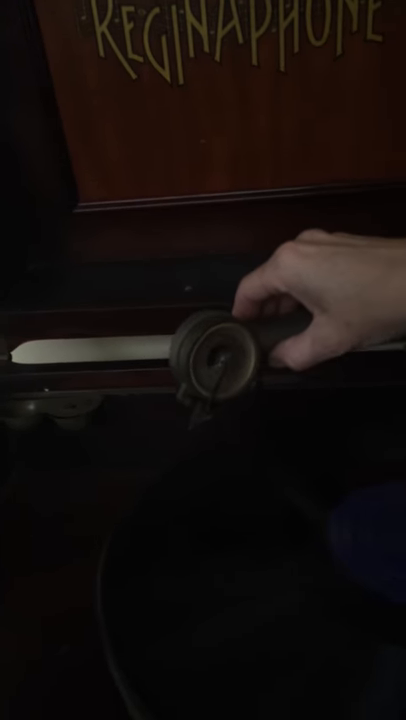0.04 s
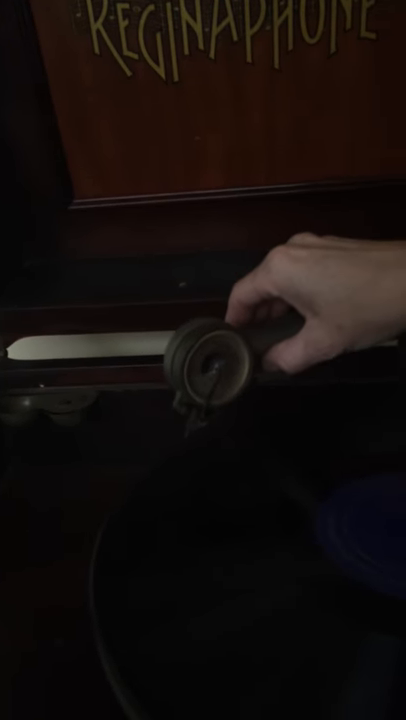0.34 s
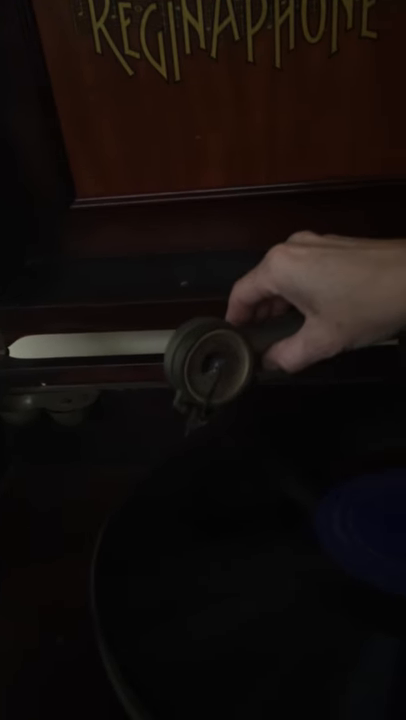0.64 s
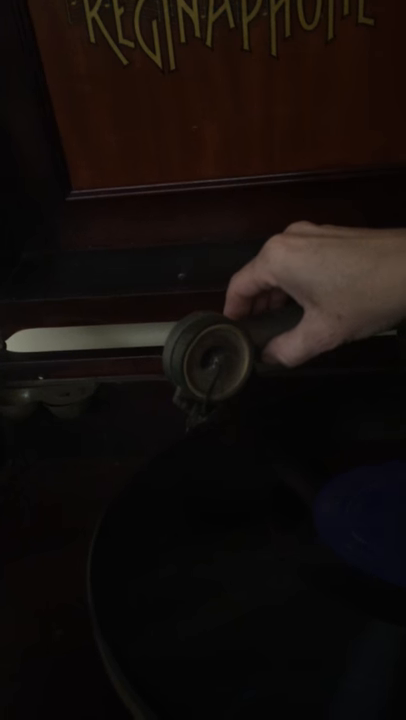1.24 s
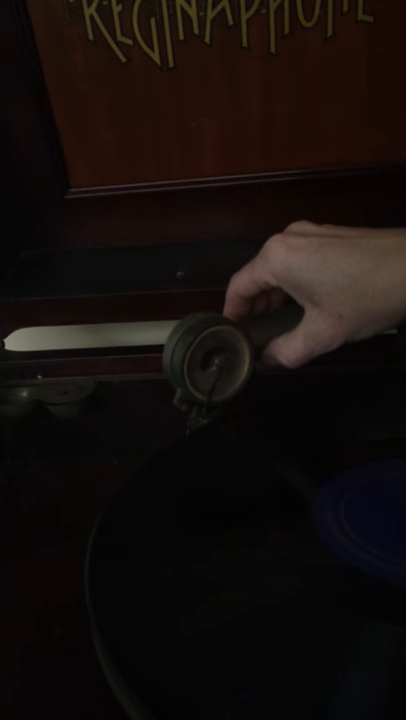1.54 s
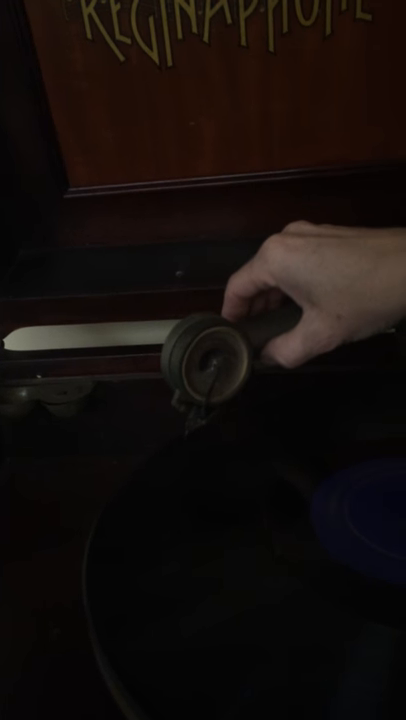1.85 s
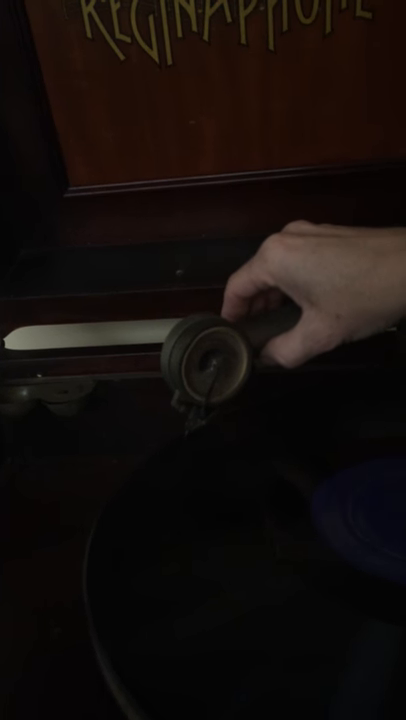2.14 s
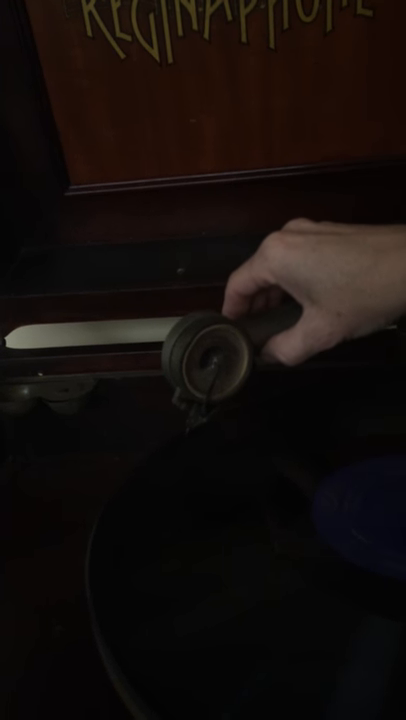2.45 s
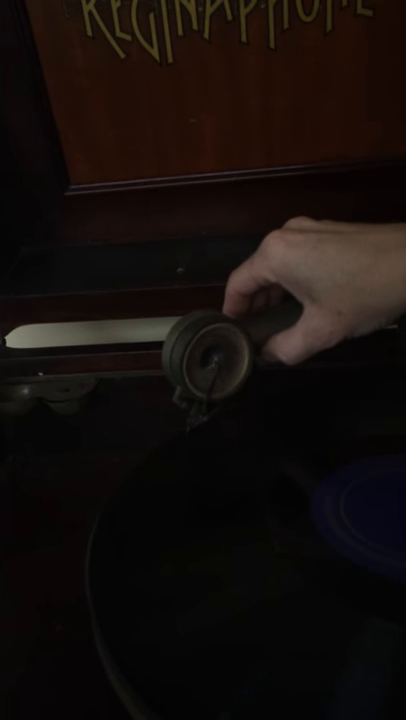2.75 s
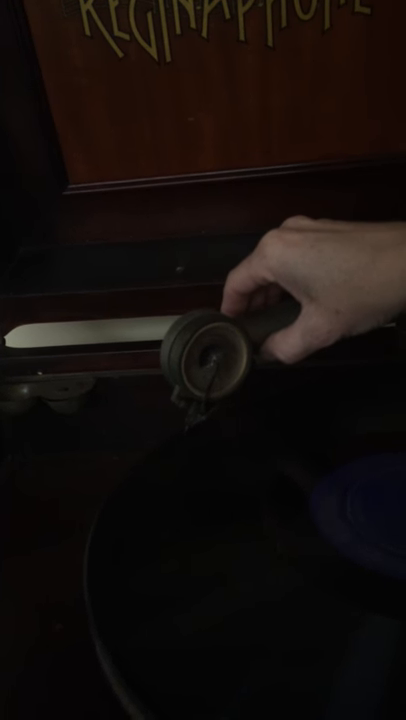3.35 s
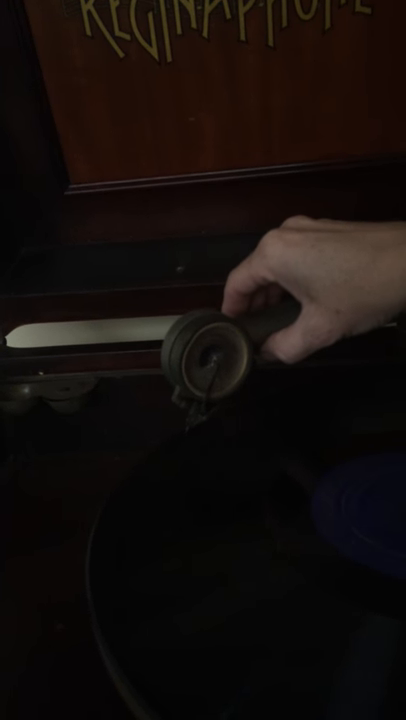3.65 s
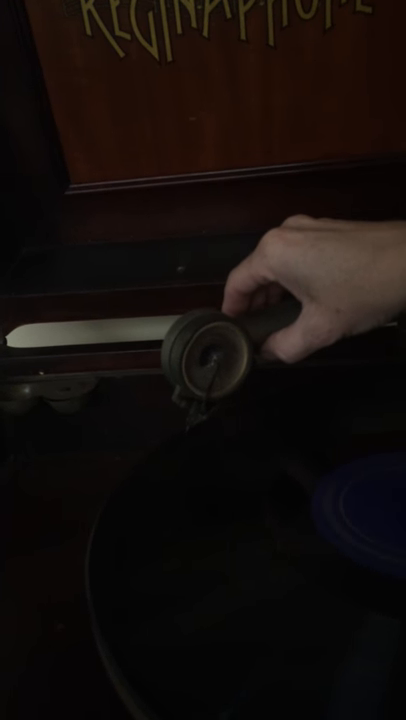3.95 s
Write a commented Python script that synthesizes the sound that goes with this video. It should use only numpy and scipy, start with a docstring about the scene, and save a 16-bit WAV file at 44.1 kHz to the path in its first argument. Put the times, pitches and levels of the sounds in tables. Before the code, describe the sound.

Uneven ticking and low rumble of a wind-up phonograph, its needle scraping briefly twice.

```python
"""A wind-up phonograph

Heard from close by in a quiet room, its spring motor rumbles and whirs in the wooden cabinet. Uneven
ticks rattle the works, each followed by a dull knock, and a flaw in the disc clicks once a turn. A hand
on the tone arm makes the needle scrape in short bursts that ring the soundbox and horn."""
import sys
import numpy as np
from scipy import signal
from scipy.fft import rfft, irfft
from scipy.io import wavfile

SR = 44100
rng = np.random.default_rng(int(sys.argv[2]) if len(sys.argv) > 2 else 0)


def output_pcm(signal):
    """Save a mono or channel-first signal as 16-bit PCM at the path in sys.argv[1].

    Samples are clipped to [-1, 1] before scaling.
    """
    pcm = np.clip(np.atleast_2d(signal).T, -1, 1) * 32767
    wavfile.write(sys.argv[1], SR, np.round(pcm).astype(np.int16))


N = 176400

# pitches at which the wooden cabinet rings: f/Hz, width/Hz, boost/dB
CABINET_RINGS = [(66.5, 9.9, 8.2), (101.8, 20.2, 14.5), (116.5, 14.6, 11.2), (193, 38, 5), (409.3, 21, 7.2),
                 (446, 20, 10.8), (942, 108, 12)]
# pitches at which the metal works ring: f/Hz, width/Hz, boost/dB
METAL_RINGS = [(960, 49, 9.4), (1308, 46, 10.6), (1630, 230, 8.7), (1795, 57, 9.9), (2199, 114, 7.4)]
# pitches at which the soundbox and horn ring: f/Hz, width/Hz, boost/dB
HORN_RINGS = [(286.6, 33.5, 8.8), (406.5, 60, 9.44), (505.1, 24.2, 11.5), (590.6, 22, 3.7), (650, 71, 2.6),
              (947, 15, 4), (1059, 25, 10.5), (1732, 100, 9), (2435, 123, 14.8), (2876, 46, 6.3),
              (4400, 110, 9), (4840, 89, 8)]
RATTLE_PER_S, CRACKLE_PER_S = 2500, 8000  # tiny impacts in the works and at the needle


def gain(db):
    """Turn decibels into a number to multiply by."""
    return 10 ** (np.asarray(db) / 20)


def set_level(x, db=0):
    """Scale a sound to an average (rms) level."""
    return x * gain(db) / np.sqrt(np.mean(x ** 2))


def loudness_curve(rows):
    """A gain that glides through (t/s, level/dB) points."""
    return gain(np.interp(np.arange(N) / SR, *np.array(rows).T))


def taps(rows):
    """One sharp tap for each (t/s, level/dB) row."""
    out = np.zeros(N)
    for t, db in rows:
        out[int(t * SR)] += gain(db)
    return out


def drift(per_s):
    """A smooth random wander, about 1 in size."""
    points = rng.standard_normal(N // 100)
    return set_level(np.interp(np.arange(N) / SR * per_s, np.arange(len(points)), points))


def grains(per_s, spread_db=1):
    """Tiny impacts of uneven size at random moments."""
    hits = rng.random(N) < per_s / SR
    signs = rng.choice([-1, 1], N)
    sizes = gain(spread_db * np.minimum(rng.exponential(size=N), 4))
    return set_level(hits * signs * sizes)


def rattle(hits, decay_s, per_s):
    """Break each hit into a dying flurry of tiny impacts with about the same energy."""
    fade = np.exp(-2 * np.arange(SR // 10) / SR / decay_s)
    energy = signal.fftconvolve(hits ** 2, fade / fade.sum())[:N]
    return np.sqrt(np.abs(energy)) * grains(per_s)


def resonate(x, tone, rings=(), size=16384):
    """Pass a sound through an object with a broad tone and some ringing pitches."""
    f = np.maximum(np.arange(size // 2 + 1) * SR / size, 1)
    tone_hz, tone_db = np.array(tone).T
    db = np.interp(np.log(f), np.log(tone_hz), tone_db)
    db += sum(boost / (1 + (2 * (f - hz) / width) ** 2) for hz, width, boost in rings)
    # build the object's answer to one tap, so that it rings only after being hit
    cepstrum = irfft(np.log(gain(db)))[:size // 2]
    cepstrum[0] = 0
    answer = irfft(np.exp(rfft(2 * cepstrum, size)))[:size // 2]
    return signal.fftconvolve(x, answer / np.linalg.norm(answer))[:N]


def motor(turn_s=1.16, wobble_db=1.95):
    """Meshing gears drone in the cabinet; their light chatter comes round with every turn."""
    # tone of the low drone: f/Hz, level/dB
    drone_tone = [(20, -20), (45, -7.5), (100, -6), (200, -3), (300, -19.5), (400, -6), (650, -13),
                  (850, -22.5), (1200, -16.5), (2000, -29.5), (9000, -75)]
    # tone of the gear chatter: f/Hz, level/dB
    chatter_tone = [(1500, 2.5), (3600, -5), (5000, -24.5)]
    drone = resonate(grains(per_s=5000, spread_db=3.6), drone_tone, CABINET_RINGS)
    drone *= gain(wobble_db * drift(per_s=23))
    one_turn = grains(per_s=60, spread_db=2)[:int(turn_s * SR)]
    teeth = rattle(np.resize(one_turn, N), decay_s=0.006, per_s=RATTLE_PER_S)
    chatter = resonate(teeth, chatter_tone, METAL_RINGS)
    return set_level(drone, db=-52) + set_level(chatter, db=-68.5)


def hiss():
    """A faint, steady hiss lies under everything."""
    # tone of the hiss: f/Hz, level/dB
    hiss_tone = [(2000, 6), (4500, -1), (8000, -1.5), (11000, -6), (15500, -8.5)]
    return set_level(resonate(rng.standard_normal(N), hiss_tone), db=-76)


def ticks(knock_delay_s=0.01407):
    """Each tick is a crack and a brief rattle of metal, then a dull knock from the cabinet."""
    # ticks of the running works: t/s, relative level/dB
    tick_times = [(.035, -45), (.099, -53), (.119, -50.5), (.187, -47.5), (.250, -52), (.318, -47.5),
                  (.390, -59), (.409, -58), (.474, -46), (.485, -46.5), (.622, -55.5), (.744, -53.5),
                  (.937, -57.5), (.963, -48.5), (1.043, -55.5), (1.073, -51), (1.122, -55), (1.197, -45),
                  (1.206, -44.5), (1.286, -55.5), (1.341, -48.5), (1.475, -48), (1.567, -55.5),
                  (1.632, -43.5), (1.760, -53.5), (1.836, -57), (1.906, -53), (1.949, -57.5),
                  (2.098, -58.5), (2.128, -52), (2.196, -56), (2.236, -49), (2.795, -44.5), (2.872, -53),
                  (3.068, -53), (3.116, -52.5), (3.241, -58), (3.267, -65), (3.287, -52), (3.385, -54),
                  (3.441, -46), (3.483, -49), (3.527, -47), (3.753, -46.5), (3.826, -46.5)]
    # tone of a tick: f/Hz, level/dB
    tick_tone = [(200, -14.5), (1150, -2.5), (2000, -3.5), (2700, -8.5), (3700, -17.5), (4700, -30.5),
                 (15000, -44)]
    # tone of a knock in the wood: f/Hz, level/dB
    knock_tone = [(30, -26.5), (75, -3.5), (108, -18), (145, -6.5), (185, -3), (270, -16.5), (600, -49),
                  (2000, -66)]
    hits = taps(tick_times)
    flurry = rattle(hits, decay_s=0.012, per_s=RATTLE_PER_S)
    metal = resonate(gain(-5) * hits + gain(4.5) * flurry, tick_tone, METAL_RINGS)
    shoves = hits * np.sqrt(hits / hits.max())  # soft ticks barely move the wood
    late_shoves = np.pad(shoves, (int(knock_delay_s * SR), 0))[:N]
    knocks = resonate(late_shoves, knock_tone, CABINET_RINGS)
    return gain(18) * metal + gain(23) * knocks


def clicks():
    """A flaw in the disc passes the needle with a thin, dry snap."""
    # one click in each turn: t/s, level/dB
    click_times = [(.570, -42), (1.726, -43.5), (2.892, -42)]
    # tone of a click: f/Hz, level/dB
    click_tone = [(500, -21), (3000, -5), (7500, 1), (11000, -7), (14500, -4)]
    return resonate(rattle(taps(click_times), decay_s=0.007, per_s=CRACKLE_PER_S), click_tone)


def needle_drag(waver=0.0403):
    """The needle sticks, slips and judders across the grooves, ringing the horn."""
    # the judder holds a pitch, then jumps, mostly lower as a stroke slows: start t/s, f/Hz
    judder_pitches = [(2.28, 433.3), (2.315, 665), (2.41, 507.8), (2.46, 400.7), (2.51, 592.1),
                      (2.555, 505.7), (2.618, 411.8), (2.655, 279.5), (3.62, 545.6), (3.662, 396.6),
                      (3.89, 668), (3.97, 418)]
    # how hard the needle drags: t/s, relative level/dB
    drag_levels = [(2.284, -57), (2.298, -29), (2.33, -30.5), (2.348, -38), (2.385, -26), (2.41, -37),
                   (2.426, -28), (2.458, -34.5), (2.474, -28.5), (2.495, -54), (2.524, -29.5),
                   (2.552, -35.5), (2.586, -25), (2.606, -32.5), (2.64, -30.5), (2.668, -34.5), (2.70, -57),
                   (3.622, -60.5), (3.636, -37.5), (3.654, -31), (3.675, -47.5), (3.70, -51), (3.715, -28),
                   (3.735, -49), (3.87, -58), (3.89, -37.5), (3.908, -30.5), (3.93, -41), (4.0, -36.5)]
    # tone of the dragging: f/Hz, level/dB
    drag_tone = [(60, -29.5), (180, -10.5), (340, -10.5), (430, -2), (780, -1), (900, -9.5), (1200, -14.5),
                 (2000, -27.5), (4000, -44.5)]
    starts, pitches = np.array(judder_pitches).T
    row = np.maximum(np.searchsorted(starts, np.arange(N) / SR) - 1, 0)
    hz = pitches[row] * (1 + waver * drift(per_s=250))
    judder = gain(-17) * np.sin(2 * np.pi * np.cumsum(hz) / SR)
    scrape = (grains(per_s=2500) + judder) * loudness_curve(drag_levels)
    return gain(-3) * resonate(scrape, drag_tone, HORN_RINGS)


def needle_grit(pitch_shift=0.026):
    """Fine scratching rings the soundbox, whose pitches shift as the hand's pressure changes."""
    # strength of the scratching: t/s, relative level/dB
    grit_levels = [(2.284, -92), (2.289, -48), (2.31, -45), (2.347, -60), (2.362, -49), (2.40, -58),
                   (2.425, -50), (2.45, -62), (2.465, -51), (2.482, -79), (2.505, -70), (2.522, -44.5),
                   (2.552, -56), (2.588, -43.5), (2.604, -54.5), (2.625, -45.5), (2.685, -55.5),
                   (2.70, -90.5), (3.624, -77), (3.630, -50.5), (3.652, -45.5), (3.668, -78), (3.70, -68),
                   (3.712, -46.5), (3.724, -58), (3.735, -85), (3.863, -95), (3.885, -70), (3.912, -55),
                   (3.945, -62.5), (4.0, -53.5)]
    # bright tone of the scratching: f/Hz, level/dB
    grit_tone = [(300, -29), (1200, 2), (2500, 8), (4500, 1.5), (5600, -1), (8000, -2), (11000, -8.5),
                 (15500, -10)]
    grit = grains(per_s=3800) * loudness_curve(grit_levels)
    pressure = np.pi / 4 * (1 + np.tanh(2 * drift(per_s=12)))  # an angle that blends low into high
    out = np.zeros(N)
    for share, scale in (np.cos(pressure), 1 - pitch_shift), (np.sin(pressure), 1 + pitch_shift):
        shifted_rings = [(hz * scale, width, boost) for hz, width, boost in HORN_RINGS]
        out += resonate(grit * share, grit_tone, shifted_rings)
    return gain(-0.5) * out


def needle_snags():
    """The needle catches on a groove wall and sends a sharp crackle through the horn."""
    # moments when the needle catches: t/s, level/dB
    snag_times = [(2.586, -35), (3.866, -38), (3.887, -33.5), (3.892, -32.5), (3.906, -28.5),
                  (3.912, -32.5), (3.963, -30), (3.982, -36)]
    # tone of a snag: f/Hz, level/dB
    snag_tone = [(400, -5), (6500, -1), (15000, -8)]
    crackle = rattle(taps(snag_times), decay_s=0.0028, per_s=CRACKLE_PER_S)
    return resonate(crackle, snag_tone, HORN_RINGS)


def room(x, bass_s=0.48, treble_s=0.29, split_hz=2060, echo_db=-9):
    """A small furnished room adds a short echo whose treble dies first."""
    t = np.arange(SR // 2) / SR
    noise = rng.standard_normal(len(t))
    bass = signal.sosfilt(signal.butter(2, split_hz, fs=SR, output="sos"), noise)
    bass_fade, treble_fade = gain(-60 * t / bass_s), gain(-60 * t / treble_s)
    echo = (bass * bass_fade + (noise - bass) * treble_fade) / np.linalg.norm(bass_fade)
    return x + gain(echo_db) * signal.fftconvolve(x, echo)[:N]


def scene():
    """Steady motor and hiss, with ticks, clicks and scrapes echoing in the room."""
    steady = hiss() + motor()
    events = ticks() + clicks() + needle_drag() + needle_grit() + needle_snags()
    return (steady + room(events))[None]


def record(dry, top_hz=15750):
    """Cut away the very highest treble."""
    return signal.sosfilt(signal.ellip(10, .2, 70, top_hz, fs=SR, output="sos"), dry)


dry = scene()
out = record(dry)
output_pcm(out)
```